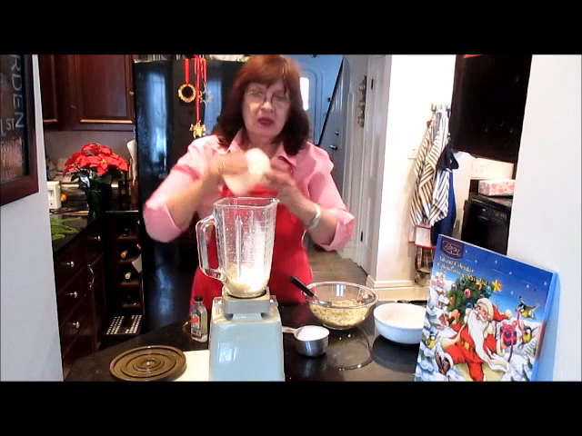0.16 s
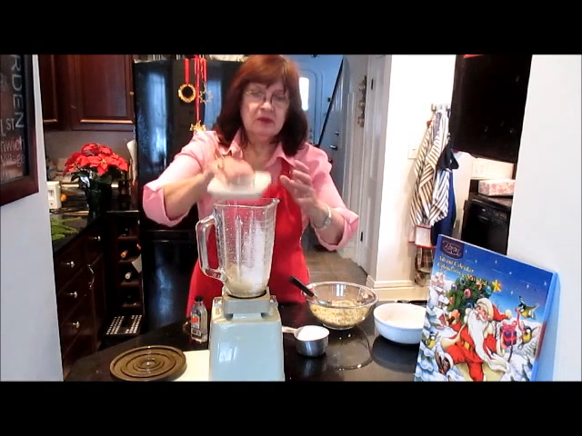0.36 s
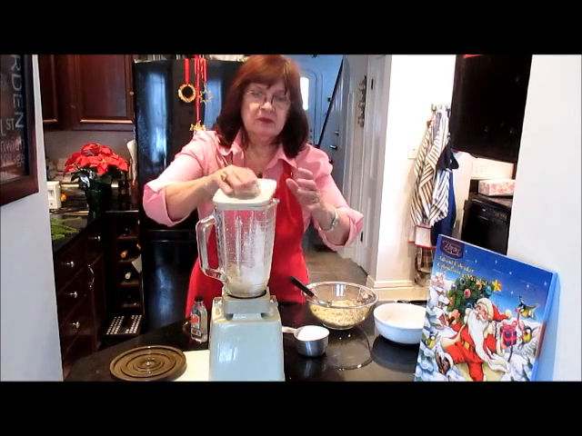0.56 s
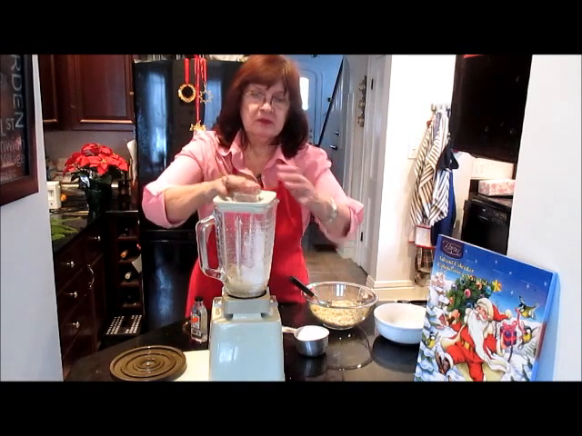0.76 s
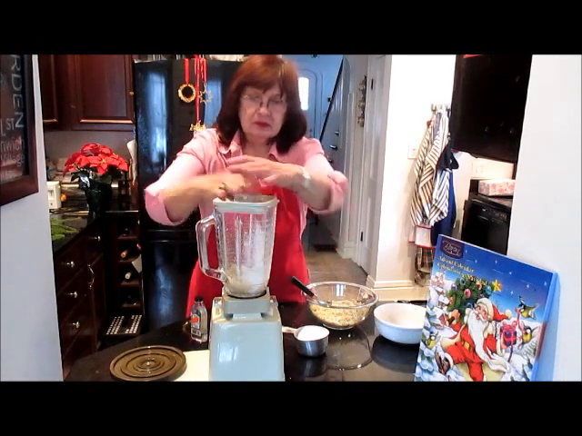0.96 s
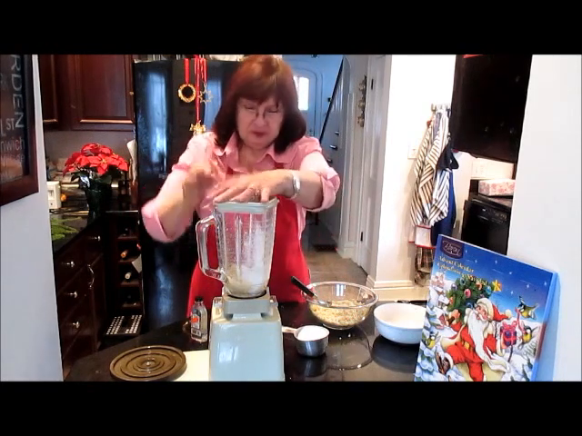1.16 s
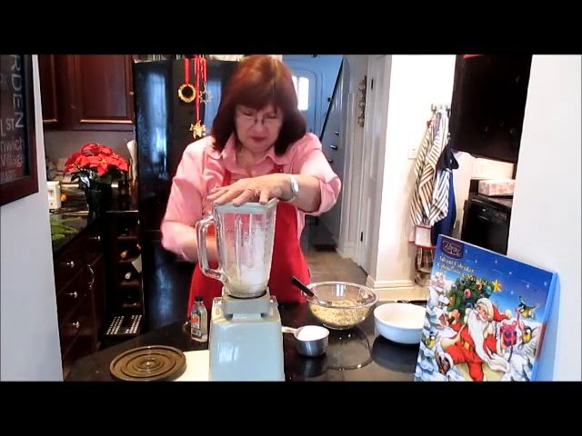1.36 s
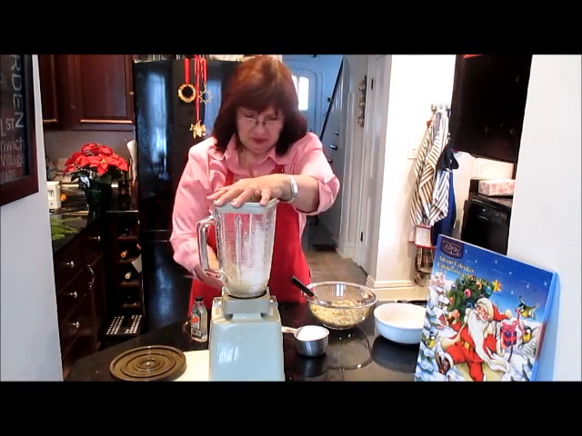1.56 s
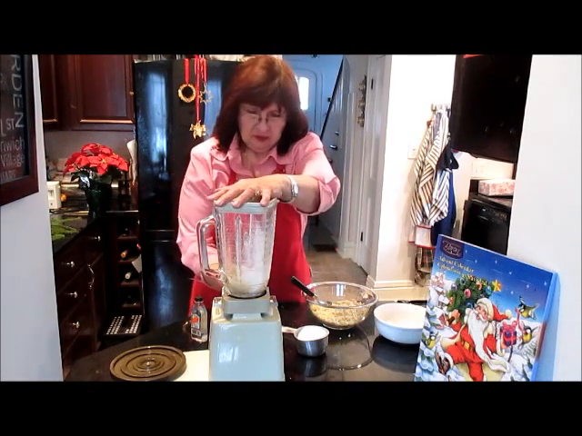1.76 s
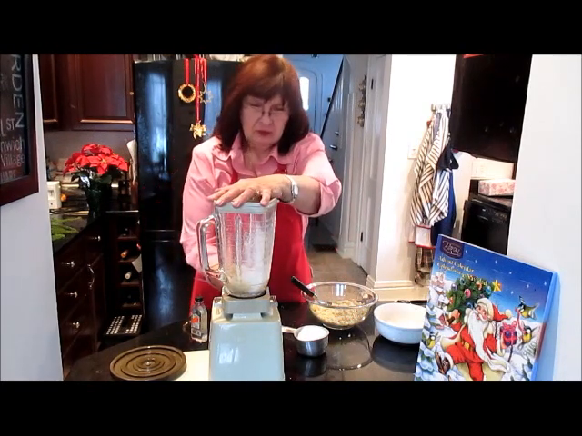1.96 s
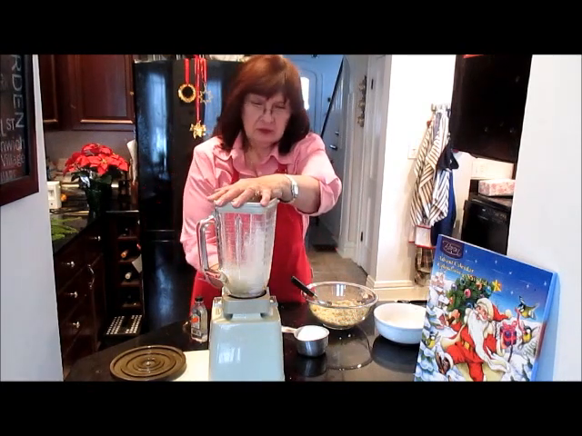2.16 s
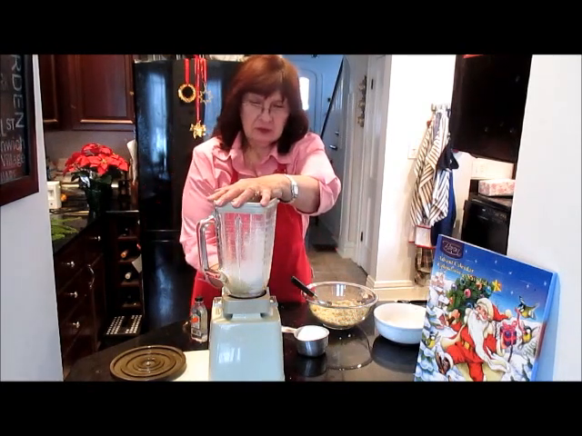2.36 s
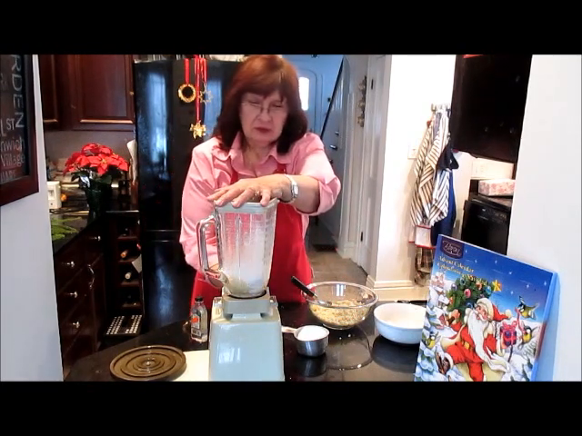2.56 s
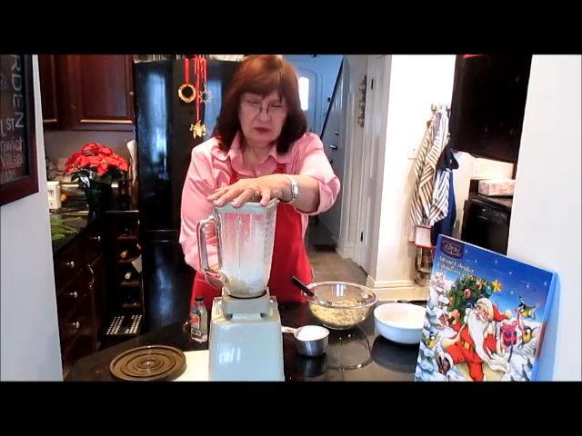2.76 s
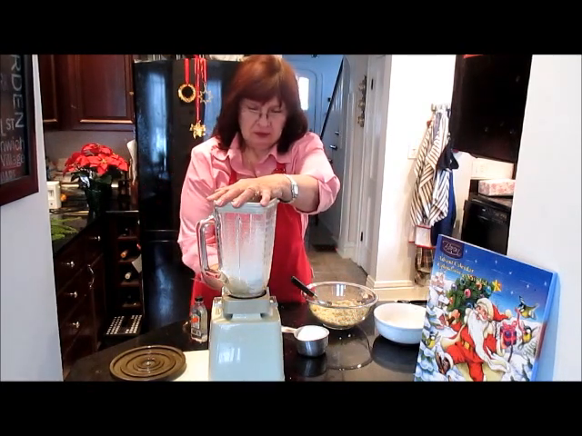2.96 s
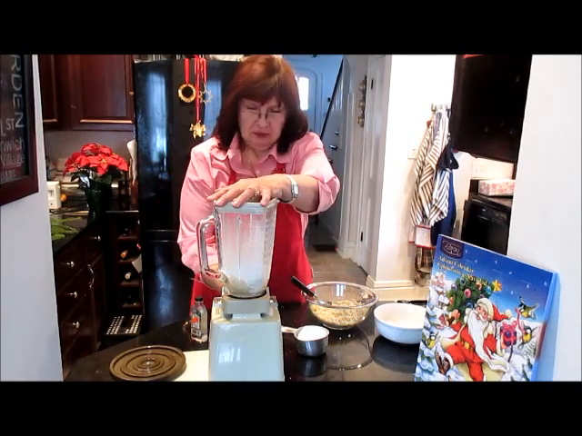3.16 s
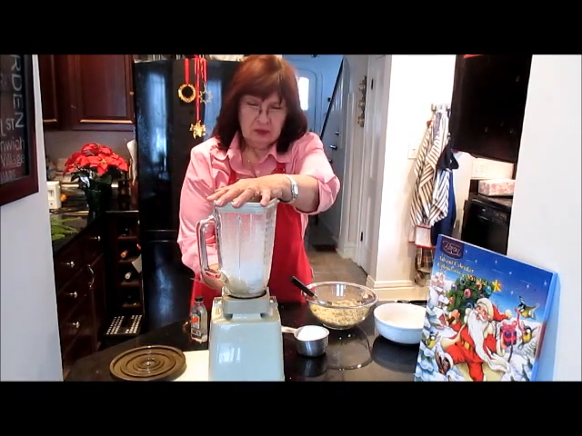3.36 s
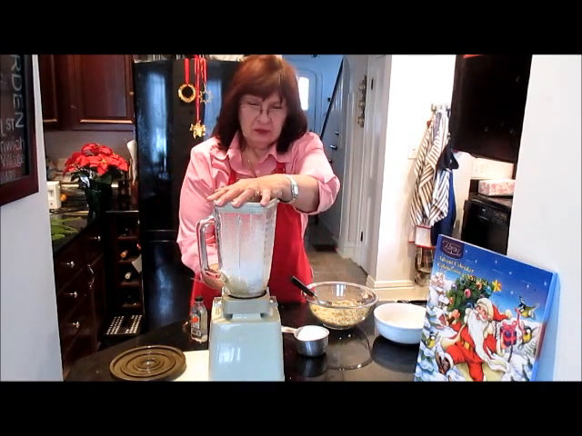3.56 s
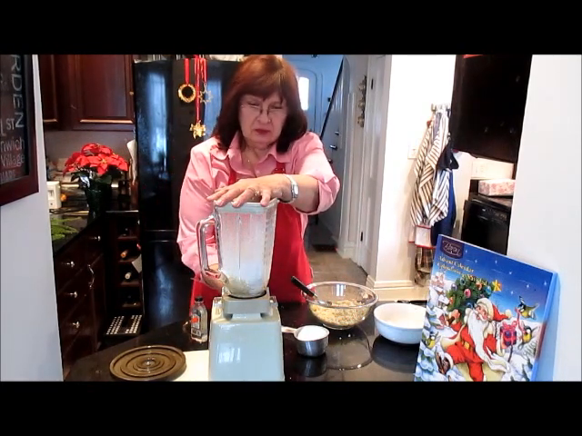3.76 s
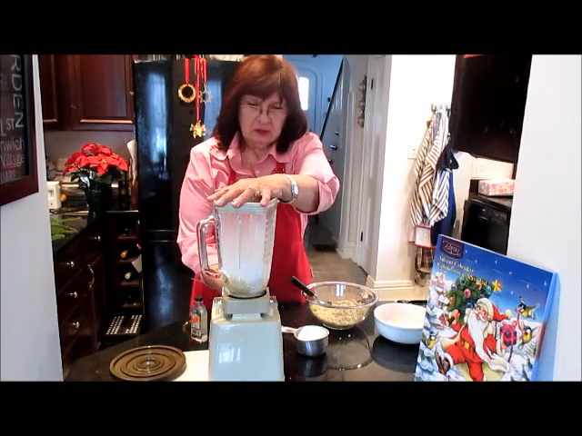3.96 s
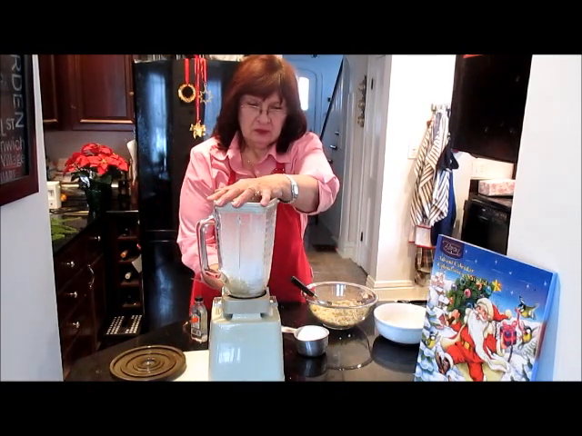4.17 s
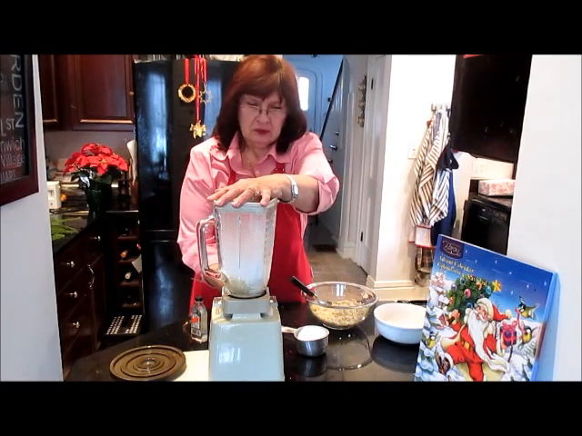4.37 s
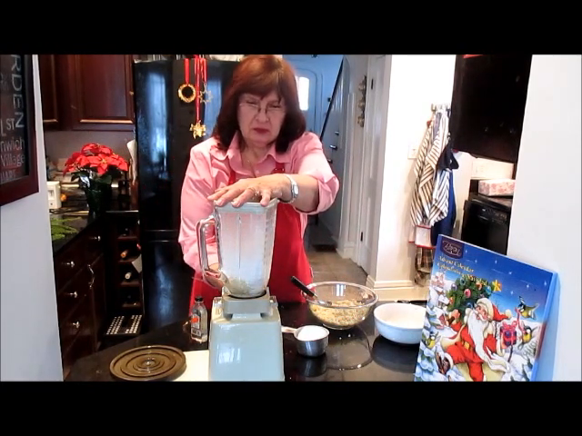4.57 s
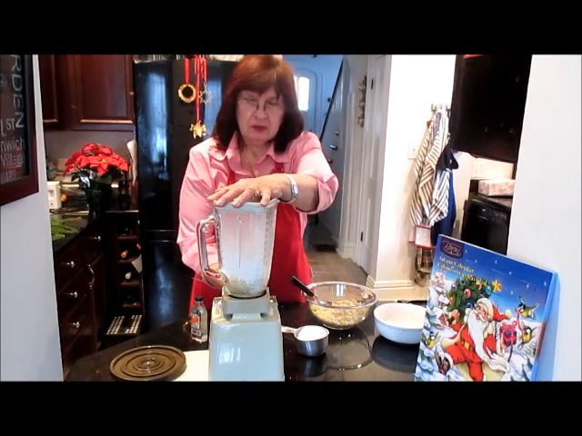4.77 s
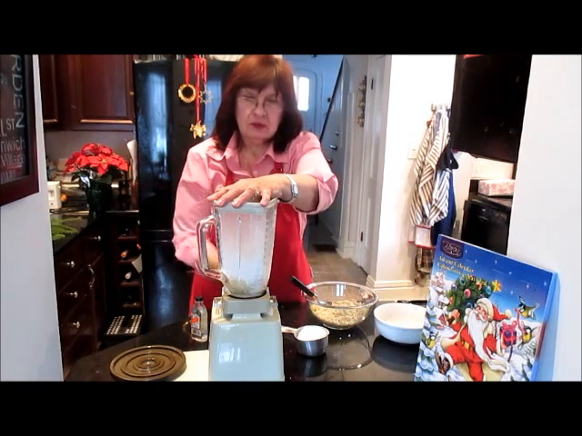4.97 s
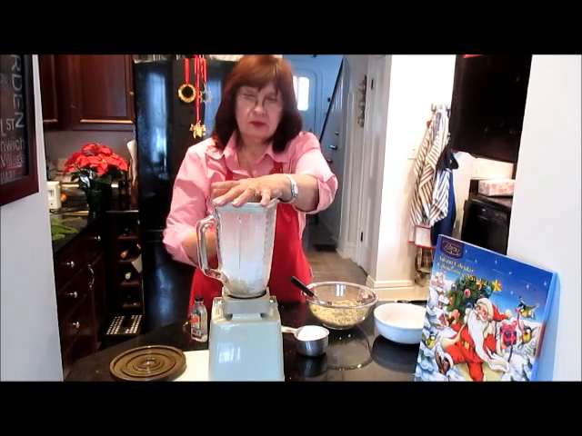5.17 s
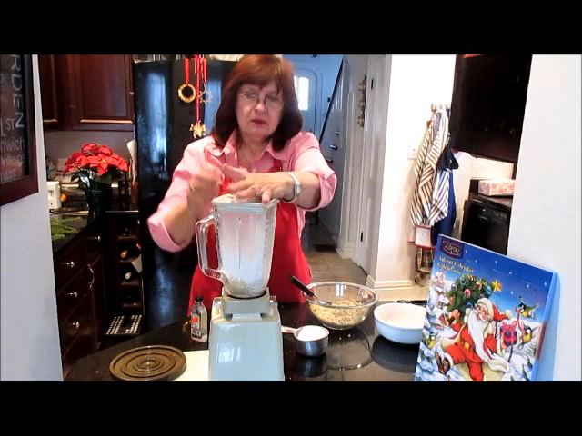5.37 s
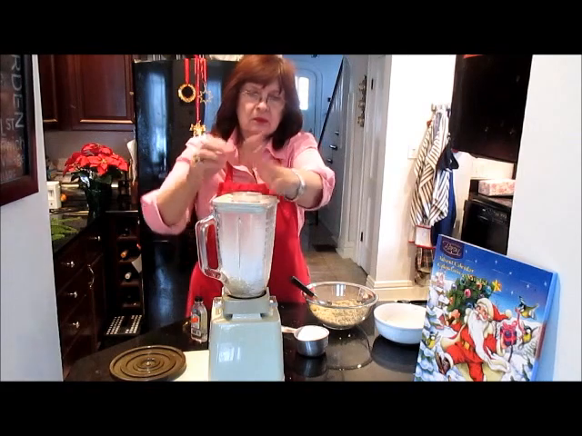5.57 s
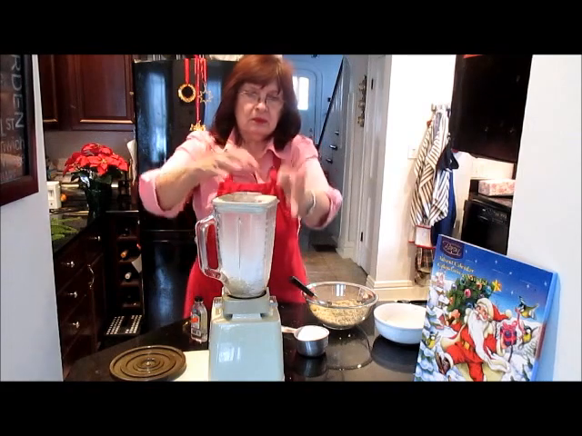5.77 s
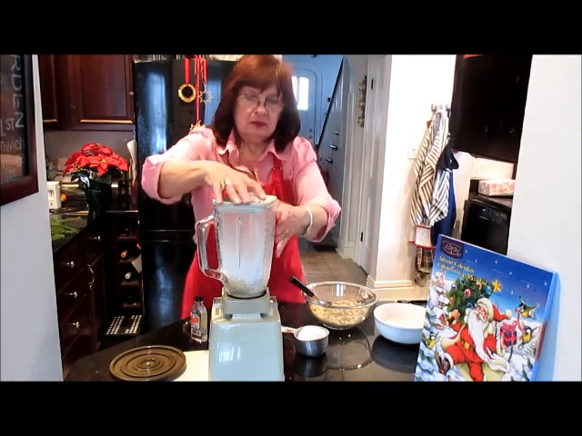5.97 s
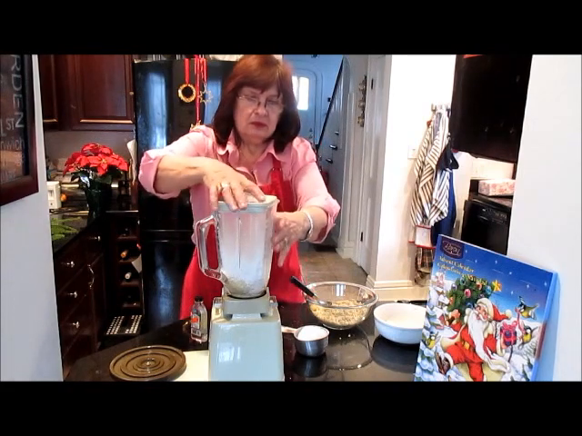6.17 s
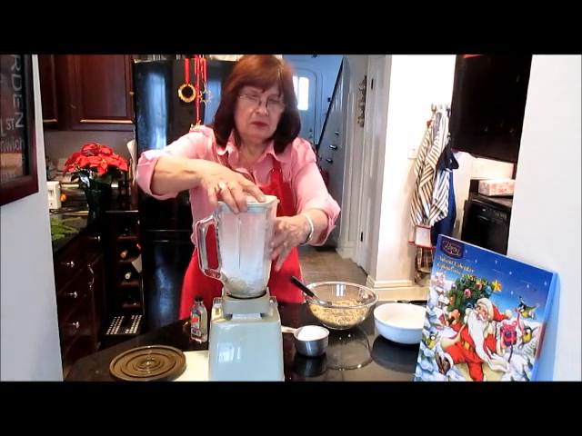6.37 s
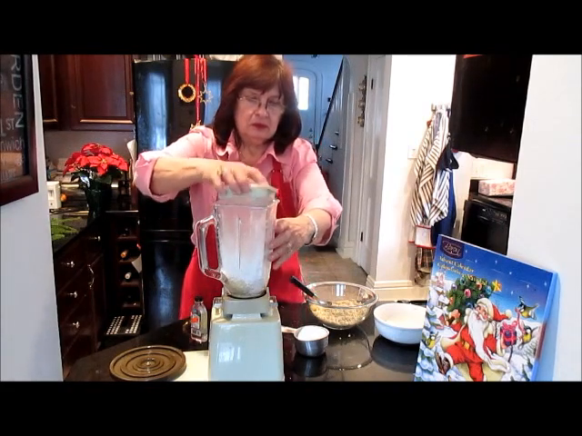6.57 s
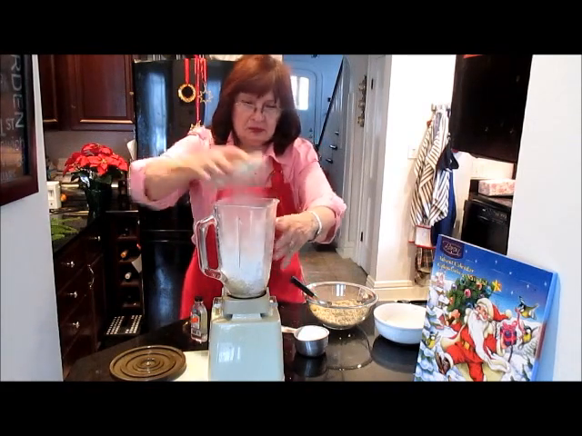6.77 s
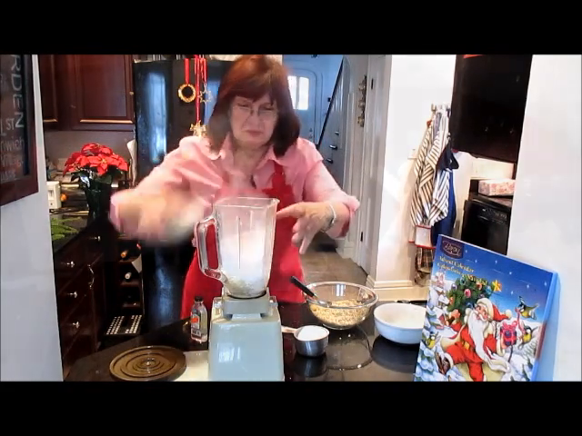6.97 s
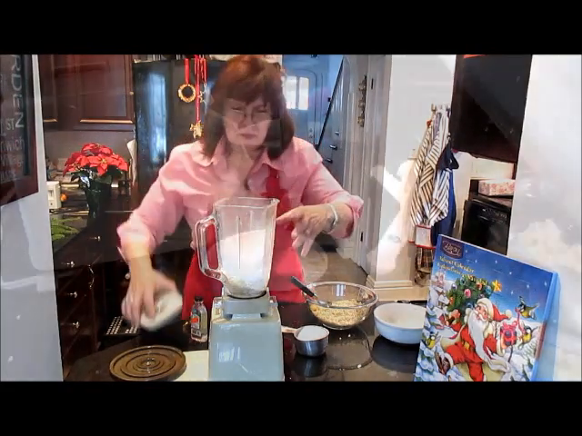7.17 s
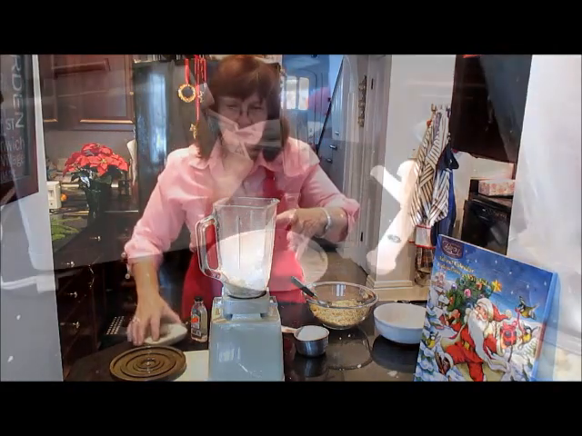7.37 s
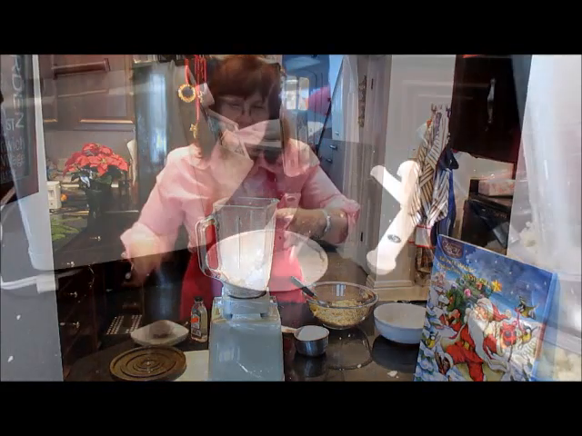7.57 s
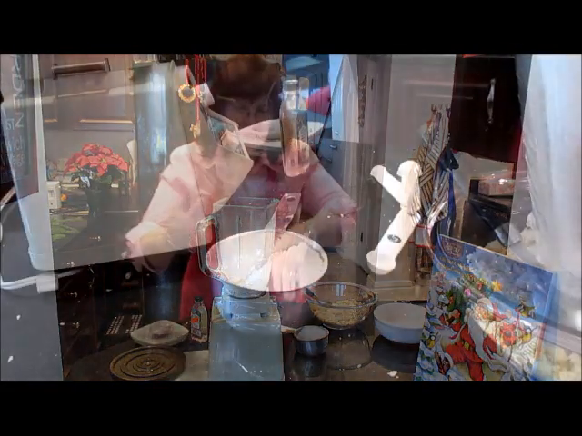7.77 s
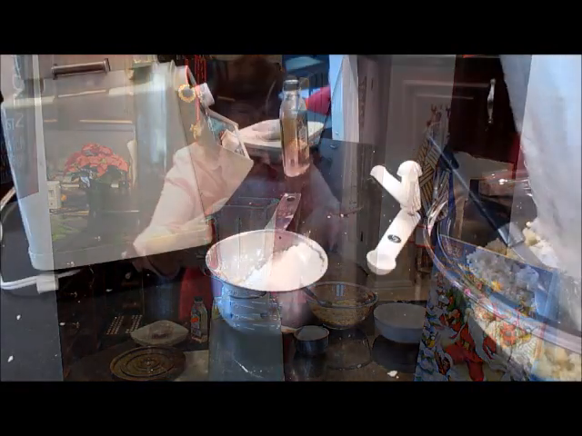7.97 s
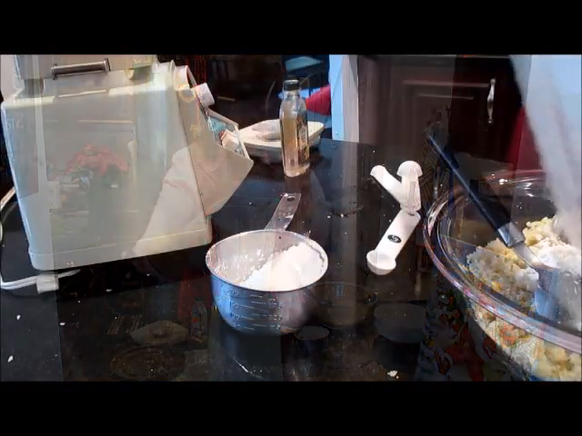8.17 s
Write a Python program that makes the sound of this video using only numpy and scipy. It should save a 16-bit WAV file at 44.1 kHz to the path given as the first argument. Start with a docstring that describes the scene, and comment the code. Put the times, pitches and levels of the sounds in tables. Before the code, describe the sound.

After light lid taps, a blender whirs and rattles, coasts to a stop, and plastic and glass clunk down.

```python
"""A glass-jar blender spins up, grinds dry crumbs and coasts to rest in a kitchen.
Its shaft sings in harmonics of the rotation rate and forces the motor base into a resonant drone,
while the blades roar through the load and grit and chips rattle on the glass.
Impacts excite decaying modes: the lid is pressed on first; afterwards plastic clacks on the counter
and the jar is knocked about. Beneath it all lie the rumble and hum of the house."""
import sys
import numpy as np
from scipy import signal
from scipy.fft import rfft, irfft
from scipy.io import wavfile

SR = 44100
rng = np.random.default_rng(int(sys.argv[2]) if len(sys.argv) > 2 else 0)


def bounce(signal):
    """Save signal as a 16-bit WAV file at the path given by the first command-line argument."""
    frames = np.transpose(np.atleast_2d(signal))
    limited = np.clip(frames, -1, 1)
    pcm = np.round(limited * 32767).astype(np.int16)
    wavfile.write(sys.argv[1], SR, pcm)


N = 362278

ON_S, OFF_S, STOP_S = 2.01, 4.58, 6.58  # power on, power off, the load catches the shaft
RUN_HZ, MAINS_HZ = 176.7, 60  # full shaft speed, supply frequency
BREAK_UP_S = 2.374  # whole pieces shatter

# resonances that lift a tone gliding through them (frequency [Hz], width [Hz], gain [dB])
BLENDER_RESONANCES = [(400, 260, 5), (514, 24, 6), (862, 30, 2), (1579, 22, 9), (1722, 60, 6)]
# resonances of the loaded jar (frequency [Hz], width [Hz], gain [dB])
JAR_RESONANCES = [(1640, 40, 4), (2100, 160, 2), (2700, 220, 4), (4600, 300, 2), (5680, 200, 5.5),
                  (6140, 170, 4), (6550, 150, 2.5), (7540, 220, 4), (11170, 330, 5.5)]
# spectrum of a contact tick (frequency [Hz], relative level [dB])
TICK_SPECTRUM = [(60, -13), (160, -9.5), (400, -0.5), (1000, 0.5), (2500, -3), (3500, -5), (6000, -14),
                 (10000, -19.5), (16000, -31)]


def blender():
    """Rotating machinery: one shaft sets the pitch of the tones and drives drone, churn and grit."""
    t = clock()
    speed = shaft_speed() * (1 + .0005 * drift(8))
    turns = np.cumsum(speed) / SR
    moving = np.clip((t - ON_S) / .055, 0, 1) * np.clip((STOP_S - t) / .031, 0, 1)
    tones = shaft_tones(speed, turns, powered=t < OFF_S) + rotor_groan(speed, turns)
    return moving * (tones + base_drone(speed, turns) + churn(speed, turns) + grit(speed))


def shaft_speed(spin_up_s=.154, load_sag=.028, loosen_s=.95, coast_drag=.65, free_rest_s=6.69):
    """Torque balance, in turns per second: the motor pulls against drag, then friction and drag brake."""
    loading = 1 - load_sag * swell(ON_S, loosen_s)  # the fresh load holds the shaft back
    running = np.tanh(np.maximum(clock() - ON_S, 0) / spin_up_s) * loading
    share_left = np.clip((free_rest_s - clock()) / (free_rest_s - OFF_S), 0, 1)
    coasting = np.tan(coast_drag * share_left) / np.tan(coast_drag)
    return np.maximum(RUN_HZ * running * coasting, 1)


def shaft_tones(speed, turns, powered):
    """Periodic forcing: blades and armature sound shaft harmonics; torque ripple adds sidebands."""
    # shaft tones (order [per turn], relative level [dB])
    harmonics = [(1, -15), (2, -7.5), (3, -1), (4, -16), (5, -1), (6, -5), (7, -5.5), (8, -11), (9, 1.5),
                 (10, -2.5), (11, -14), (16, -12), (19, -17), (20, -12)]
    # ripple tones (order [per turn], side [+1 or -1], relative level [dB])
    sidebands = [(1, 1, -14), (2, 1, -5), (3, -1, -14), (6, -1, -13), (14, 1, -9)]
    ripple_cycles = 2 * MAINS_HZ * clock()  # torque pulses twice a mains cycle
    out = np.zeros(N)
    for order, db in harmonics:
        lift_db = bumps(BLENDER_RESONANCES, order * speed) - bumps(BLENDER_RESONANCES, order * RUN_HZ)
        out += amp(db + lift_db) * flutter(order * turns)  # the load makes each tone waver
    for order, side, db in sidebands:
        out += amp(db) * powered * flutter(order * turns + side * ripple_cycles)
    return amp(-26.5) * out * (speed / RUN_HZ) ** 7


def rotor_groan(speed, turns, attack_s=.04, release_s=.18):
    """Harmonics of rotor and fan swell under light load; reverberation blurs their glides."""
    # rotor and fan tones (order [per turn], relative level [dB])
    harmonics = [(1, -22), (2, 0), (3, 1), (10, -4), (15, -9)]
    # light running after spin-up and at switch-off (time [s], hold [s], level [dB], tilt [dB/octave])
    groans = [(2.2, 0.35, -39, 2), (4.588, 0.15, -23.5, -0.5)]
    tones = [(order, amp(db + bumps(BLENDER_RESONANCES, order * speed) / 2) * flutter(order * turns))
             for order, db in harmonics]
    out = np.zeros(N)
    for s, hold_s, db, tilt_db in groans:
        envelope = (1 - fade(s, attack_s)) * fade(s + hold_s, release_s)
        out += envelope * sum(amp(db + tilt_db * np.log2(order)) * tone for order, tone in tones)
    return kitchen(out, wet_db=-2)


def base_drone(speed, turns, throb=.38, climb_db=12, knee_hz=92):
    """Forced vibration: each turn jolts the base, and harder jolts favour its higher resonances."""
    # the motor base on the counter (frequency [Hz], width [Hz], relative level [dB])
    resonances = [(266.8, 11, -7), (325.8, 10.8, -2.5), (387.7, 13.2, 0.5), (438, 32, -0.5),
                  (463.1, 9.2, 2.5), (524, 16.7, -6)]
    jolts = rfft(rng.standard_normal(N) * (1 + throb * np.cos(2 * np.pi * turns)))
    hardness = speed / RUN_HZ + .76 * swell(ON_S, .55)  # speed plus the strain of starting
    hz, out = np.fft.rfftfreq(N, 1 / SR), np.zeros(N)
    for centre, width, db in resonances:
        lean_db = climb_db * np.log2(centre / 400) * (hardness - .6)
        out += amp(db + lean_db) * irfft(jolts / (1 + 1j * (hz - centre) / width) ** 2, N)
    calm_db = 10 * np.log10(speed ** 2 / (speed ** 2 + knee_hz ** 2))
    shudder_db = 11.5 * swell(ON_S, .46)
    damping_db = -6.5 * swell(ON_S, .98)  # by the fresh load
    return amp(-26 + calm_db + shudder_db + damping_db) * unit(out)


def churn(speed, turns, chop=.036, lumps_db=1, db_per_octave=8):
    """Modulated noise: blades chop the load in uneven lumps; the roar dulls to a scrape as they slow."""
    # spectra of fast and of slow blades (frequency [Hz], relative level [dB])
    roar_spectrum = [(60, -22), (200, -21.5), (300, -8.5), (550, -5), (660, -6.5), (860, 2), (1200, -2),
                     (1700, -1.5), (2500, 0), (3100, -3.5), (4000, -11.5), (6000, -19.5), (16000, -47)]
    scrape_spectrum = [(60, -24), (200, -3), (300, -13.5), (550, 1.5), (660, -12.5), (900, 1.5),
                       (1500, -4.5), (2150, -4), (2700, -13.5), (4000, -17), (6000, -12.5), (16000, -52)]
    cuts = rng.standard_normal(N) * (1 + chop * np.cos(2 * np.pi * turns)) * amp(lumps_db * drift(40))
    roar = unit(colour(cuts, roar_spectrum, JAR_RESONANCES))
    scrape = unit(colour(cuts, scrape_spectrum, JAR_RESONANCES))
    fast = np.clip(speed / RUN_HZ, 0, 1) ** 2
    grinding = kitchen(fast * roar + (1 - fast) * scrape, wet_db=-8)
    first_bite_db = 20 * fade(ON_S, .1)
    level_db = -21.5 + db_per_octave * np.log2(speed / RUN_HZ) + first_bite_db + .3 * turnover()
    return amp(level_db) * unit(grinding)


def grit(speed, clumps_db=1.6, db_per_octave=10):
    """Shot noise: crumbs hit the glass in a dense hiss at full speed, a fine patter as the blades slow."""
    # crumbs on glass (frequency [Hz], relative level [dB])
    spectrum = [(500, -51), (2500, -15), (3800, -5), (4600, -2.5), (5200, -3.5), (6200, 3), (7300, -2.5),
                (8300, -6), (10200, -7), (11600, -16), (14000, -17), (16000, -27.5)]
    hits_per_s = 400 + 14000 * (speed / RUN_HZ) ** 3
    sizes = amp(3 * np.minimum(rng.exponential(1, N), 3.5)) * rng.choice([-1, 1], N)
    hits = sizes * (rng.random(N) < hits_per_s / SR) / np.sqrt(hits_per_s)
    hits *= amp(clumps_db * drift(80))
    rattle = kitchen(colour(hits, spectrum, JAR_RESONANCES), wet_db=-5)
    level_db = -24 + db_per_octave * np.log2(speed / RUN_HZ) + .23 * turnover()
    break_up_db = 5.5 * swell(BREAK_UP_S, .28)
    power_off_db = -3 * (1 - fade(OFF_S, .076))
    fall_back_db = 4 * swell(5.42, .23)  # crumbs drop onto the slowing blades
    return amp(level_db + break_up_db + power_off_db + fall_back_db) * unit(rattle)


def turnover(period_s=.701):
    """Slow amplitude modulation: the load heaves round the jar."""
    return np.cos(2 * np.pi * (clock() - BREAK_UP_S) / period_s)


def chips(spatter_s=5.85, half_span_s=.5, count=34, db_per_s=-16, spread_db=5):
    """Impulse excitation: hard pieces snap against the jar and sound its resonances."""
    # large chips flung by the slowing blades (time [s], level [dB])
    large_chips = [(4.9786, -21.5), (5.4182, -24), (5.5432, -25), (5.605, -27), (5.714, -31), (5.841, -28),
                   (6.1743, -34), (6.253, -34.5)]
    # spectrum of a snap, and its passage through the glass (frequency [Hz], gain [dB])
    snap = [(500, 3), (2000, 3.5), (3200, -0.5), (4500, 6), (6200, 6.5), (9000, -1.5), (11500, -10.5),
            (13300, -10), (16000, -14)]
    through_glass = [(500, -3.5), (6000, -4), (16000, -2.5)]
    out = np.zeros(N)
    for s, db in large_chips:
        add(out, s, amp(db) * crack(snap, decay_s=.009))
    for slot, (place, size) in enumerate(rng.random((count, 2))):  # a weakening spatter of small chips
        late_s = half_span_s * (2 * (slot + place) / count - 1)
        db = -36.5 + db_per_s * late_s + spread_db * (2 * size - 1)
        add(out, spatter_s + late_s, amp(db) * crack(snap, decay_s=.003))
    return kitchen(colour(out, through_glass, JAR_RESONANCES), wet_db=-5)


def knocks():
    """Free vibration: hands, lid and switch strike the blender with a tick, and base and rim ring on."""
    # blows (time [s], base level [dB], rim level [dB], tick level [dB], tick tilt [dB/octave])
    blows = [(0.057, -62, -57, -45.5, 4), (.474, -33.5, -67, -42, -7), (.502, -38.5, -44, -45.5, 0),
             (.612, -34, -47, -42, -3), (.644, -37.5, -48, -37, -6.5), (0.663, -40, -42.5, -43.5, -1),
             (.707, -39.5, -48, -35.5, -6.5), (.874, -45, -53, -53, 1.5), (.932, -58, -59, -33, -14.5),
             (0.982, -43, -65, -46, 1.5), (1.409, -31.5, -62, -40.5, -3), (1.834, -53, -69, -49, -3),
             (1.865, -48, -72, -45, -2), (2.008, -39, -54.5, -28, 4), (2.02, -18.5, -32, -24.5, 2.5),
             (4.573, -19, -43, -18.5, 3), (6.487, -47, -64, -44.5, 1.5), (6.674, -66, -51.5, -68, -13),
             (7.378, -72, -46, -49, -0.5), (7.443, -60, -25.5, -32, -2.5), (7.515, -56, -46, -34, -2.5),
             (8.107, -18.5, -43, -25.5, 0.5), (8.154, -29, -54, -34, -4), (8.19, -36, -50, -31, -5)]
    # modes of the base and of the glass rim (frequency [Hz], relative level [dB], T60 [s])
    base_modes = [(310, -14, 0.15), (390, -3.5, 0.11), (461, -3, 0.2), (516, 2.5, 0.065)]
    rim_modes = [(1140, -15, .35), (1600, 6.5, 0.19), (2800, -1, 0.16), (3268, 4.5, 0.092),
                 (4721, -31, .15)]
    out = np.zeros(N)
    for s, base_db, rim_db, tick_db, tilt_db in blows:
        add(out, s, amp(base_db) * ring(base_modes) + amp(rim_db) * ring(rim_modes))
        add(out, s, amp(tick_db) * crack(TICK_SPECTRUM, decay_s=.01, tilt_db=tilt_db))
    return out


def clinks():
    """Hard contact: metal touches the glass and excites its high modes."""
    # touches (time [s], level [dB])
    touches = [(1.234, -30), (1.63, -66)]
    # modes of the clink (frequency [Hz], relative level [dB], T60 [s])
    modes = [(1960, -11, 0.072), (3330, -15, .04), (5510, -9, 0.053), (5500, -16, 0.35),
             (5570, 10.5, 0.028), (6040, -10, 0.072), (10330, -13, 0.068)]
    out = np.zeros(N)
    for s, db in touches:
        add(out, s, amp(db) * ring(modes))
        add(out, s, amp(db - 7.5) * crack(TICK_SPECTRUM, decay_s=.012, tilt_db=-1.5))
    return out


def jar_on_counter():
    """A collision excites both bodies: the jar rings and the counter thuds."""
    # landings (time [s], thud level [dB], ring level [dB], thud tilt [dB/octave])
    landings = [(7.542, -20.5, -48, -4), (7.549, -21, -25, -4), (7.714, -17, -21.5, 0.5),
                (7.747, -32.5, -38, -7.5), (7.843, -36.5, -38, -3)]
    # modes of the jar (frequency [Hz], relative level [dB], T60 [s])
    modes = [(692, -1, 0.3), (1115, -3.5, 0.2), (1589, 2, 0.39), (1933, 3.5, 0.13), (2186, -8, 0.12),
             (2760, -31, .26), (3250, -8, 0.11), (3430, -0.5, 0.092), (4000, -34, 0.11), (5437, -22, 0.2),
             (8016, -19.5, 0.074), (9808, -30, .09)]
    # spectrum of the counter (frequency [Hz], relative level [dB])
    thud = [(60, -19), (180, -7), (270, 7), (400, 2), (560, -4.5), (720, 8.5), (1200, 4), (2100, 2),
            (2700, -12.5), (3700, -6), (6000, -31), (16000, -42)]
    out = np.zeros(N)
    for s, thud_db, ring_db, tilt_db in landings:
        add(out, s, amp(ring_db) * ring(modes))
        add(out, s, amp(thud_db) * crack(thud, decay_s=.0098, tilt_db=tilt_db))
    return out


def plastic_clack():
    """Heavy damping: hard plastic strikes the counter and its modes die almost at once."""
    # strike (time [s], level [dB])
    strikes = [(7.3984, -11)]
    # modes of the plastic (frequency [Hz], relative level [dB], T60 [s])
    modes = [(1050, 0.5, 0.029), (1117, -2, 0.013), (1910, -2, 0.0097), (3060, -22, 0.032),
             (3380, -17, 0.04), (7370, -20, 0.013)]
    out = np.zeros(N)
    for s, db in strikes:
        add(out, s, amp(db) * ring(modes))
        add(out, s, amp(db - 19) * crack(TICK_SPECTRUM, decay_s=.0036, tilt_db=3))
    return out


def kitchen(x, wet_db):
    """Reverberation: sparse reflections of random sign are added, each band dying at its own rate."""
    # decay of the room (frequency [Hz], T60 [s])
    decay = [(100, 0.2), (500, 0.37), (2000, 0.42), (6000, 0.24), (15000, 0.36)]
    taps = rng.choice([-1., 1.], SR // 2) * (rng.random(SR // 2) < .07)
    taps[:round(.005 * SR)] = 0  # gap before the first reflection
    hz, t, bands = signal.stft(taps, SR, nperseg=256)
    tail = signal.istft(bands * amp(-60 * t / read(decay, hz)[:, None]), SR, nperseg=256)[1]
    return x + amp(wet_db) * signal.fftconvolve(x, tail / np.linalg.norm(tail))[:N]


def room_tone(air_db=-45.5, hum_hz=81.2):
    """Ambient noise: the low rumble and faint hiss of the house, with a wavering hum."""
    # rumble and hiss (frequency [Hz], relative level [dB])
    spectrum = [(20, -19), (40, -11), (58, 1), (80, -6), (110, -6), (190, -12), (290, -12), (400, -17),
                (700, -21), (1300, -27.5), (3400, -34), (6000, -38), (11000, -43.5), (16000, -53)]
    # swells of the hum (time [s], half width [s], level [dB])
    hum_swells = [(3.7, .08, -49), (4.25, 0.37, -42.5), (5.6, 0.41, -44), (6.95, 0.99, -50)]
    air = amp(air_db + .6 * drift(3)) * unit(colour(rng.standard_normal(N), spectrum))
    hum_gain = sum(amp(db) * swell(s, width_s) for s, width_s, db in hum_swells)
    return air + hum_gain * unit(flutter(hum_hz * clock()))


def ring(modes):
    """Modal decay: each struck mode swells for about a cycle, then dies exponentially."""
    t = np.arange(SR // 2) / SR
    out = np.zeros(len(t))
    for hz, db, t60 in modes:
        envelope = amp(db - 60 * t / t60) * (1 - np.exp(-(t * hz) ** 2))
        out += envelope * np.sin(2 * np.pi * (hz * t + rng.random()))
    return blow(out)


def crack(spectrum, decay_s, tilt_db=0, rise_s=.00013):
    """Contact transient: a short burst of filtered noise."""
    t = np.arange(SR // 5) / SR
    burst = rng.standard_normal(len(t)) * np.exp(-t / decay_s) * (1 - np.exp(-t / rise_s))
    return blow(colour(burst, spectrum, tilt_db=tilt_db))


def flutter(cycles):
    """A tone under random amplitude and phase modulation."""
    return (1 + .25 * drift(14)) * np.cos(2 * np.pi * cycles + .3 * drift(16))


def drift(rate_hz):
    """Low-pass noise of rms 1."""
    hz = np.fft.rfftfreq(N, 1 / SR)
    return unit(irfft(rfft(rng.standard_normal(N)) * np.exp(-(hz / rate_hz) ** 2), N))


def colour(x, spectrum, peaks=(), tilt_db=0, size=4096):
    """Minimum-phase filter from a spectrum, its resonances and a tilt per octave."""
    hz = abs(np.fft.fftfreq(size, 1 / SR))
    octaves = np.log2(np.maximum(hz, 120) / 1000)
    log_gain = np.log(amp(read(spectrum, hz) + bumps(peaks, hz) + tilt_db * octaves))
    taps = np.fft.ifft(np.exp(np.conj(signal.hilbert(log_gain)))).real[:size // 2]
    return signal.oaconvolve(x, taps)[:len(x)]


def read(points, hz):
    """Interpolates on a log-frequency axis."""
    f, value = np.transpose(points)
    return np.interp(np.log(hz + 1), np.log(f + 1), value)


def bumps(peaks, hz):
    """The summed lift in dB of resonance curves."""
    return sum(db / (1 + (2 * (hz - f) / width) ** 2) for f, width, db in peaks)


def swell(s, width_s):
    """A bell curve of height 1, centred on a time."""
    return np.exp(-((clock() - s) / width_s) ** 2)


def fade(s, decay_s):
    """1 up to a time, then exponential decay."""
    return np.exp(-np.maximum(clock() - s, 0) / decay_s)


def clock():
    """The time in s at every sample."""
    return np.arange(N) / SR


def amp(db):
    """Decibels to gain."""
    return 10 ** (np.asarray(db) / 20)


def unit(x):
    """Scales to rms 1."""
    return x / np.sqrt(np.mean(x ** 2) + 1e-20)


def blow(x):
    """Scales to the energy of 20 ms at rms 1."""
    return x / np.sqrt(np.sum(x ** 2) / (SR / 50))


def add(mix, s, sound):
    """Mixes a sound in at a time."""
    part = mix[round(s * SR):][:len(sound)]
    part += sound[:len(part)]


def scene():
    """Superposition: all sources sum at one point, the nearby clack with less reverberation."""
    grinding = blender() + chips()
    handling = kitchen(knocks() + clinks() + jar_on_counter(), wet_db=-6)
    clack = kitchen(plastic_clack(), wet_db=-9.5)
    return (grinding + handling + clack + room_tone())[None]


def record(dry):
    """Clipping at full scale, then a band limit."""
    lowpass = signal.firwin(701, 15800, window=("kaiser", 9), fs=SR)
    return signal.oaconvolve(np.clip(dry, -1, 1), lowpass[None], "same")


dry = scene()
out = record(dry)
bounce(out)
```